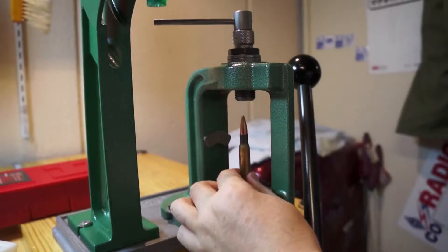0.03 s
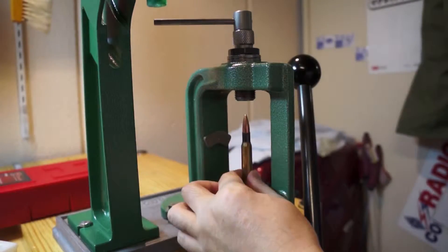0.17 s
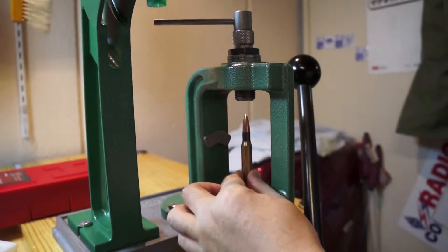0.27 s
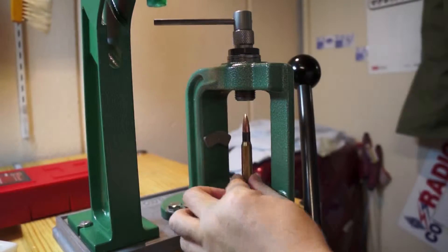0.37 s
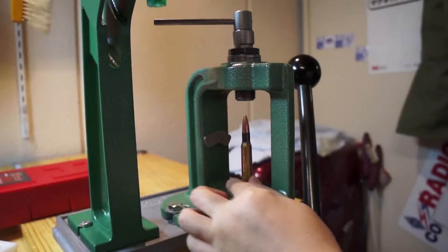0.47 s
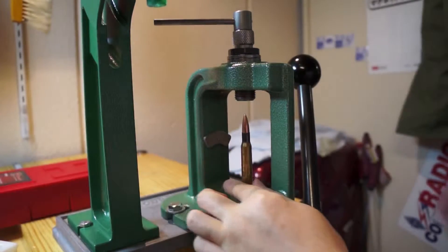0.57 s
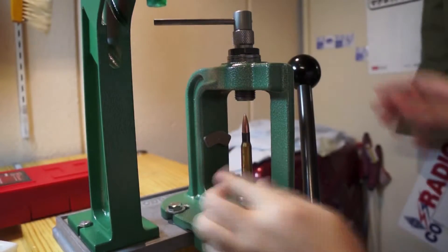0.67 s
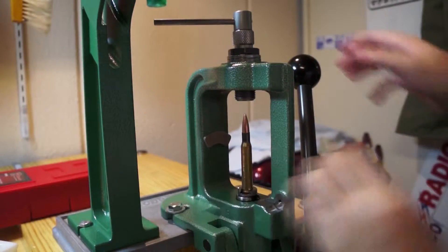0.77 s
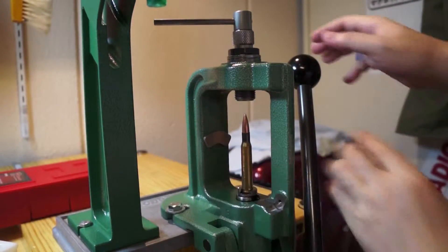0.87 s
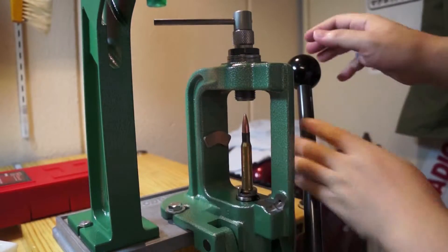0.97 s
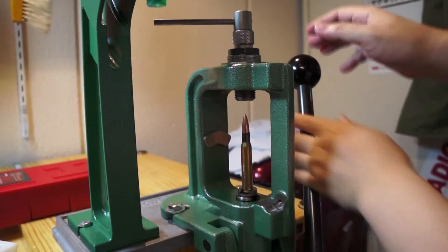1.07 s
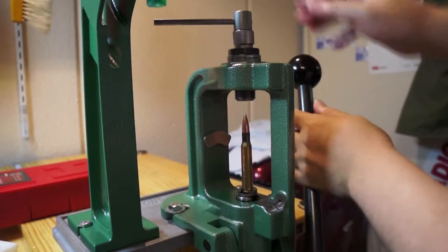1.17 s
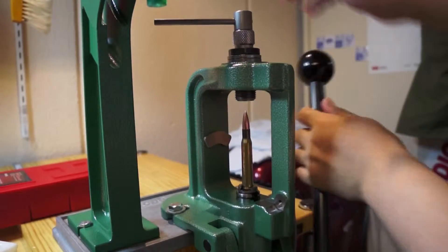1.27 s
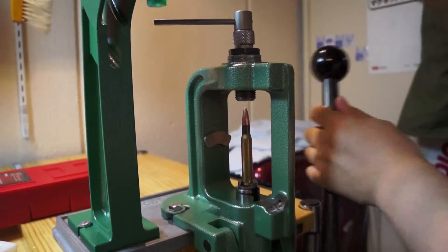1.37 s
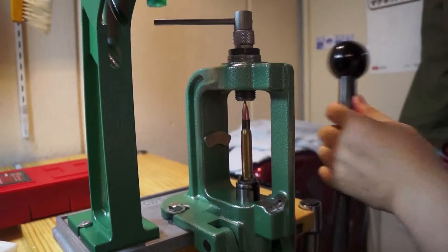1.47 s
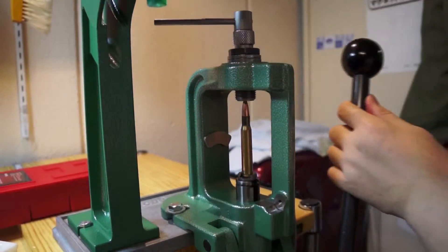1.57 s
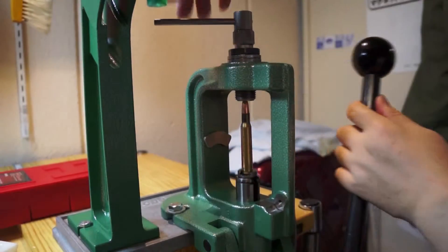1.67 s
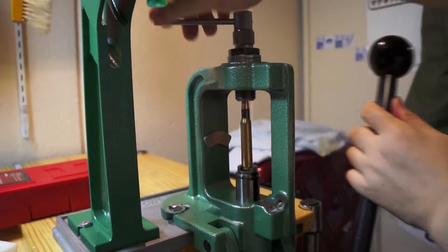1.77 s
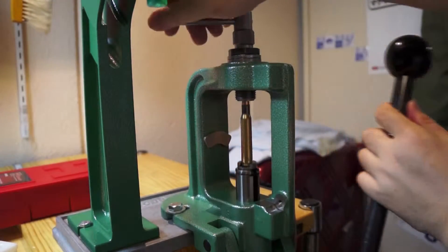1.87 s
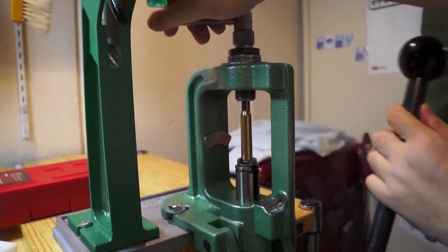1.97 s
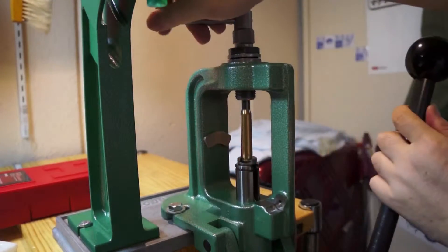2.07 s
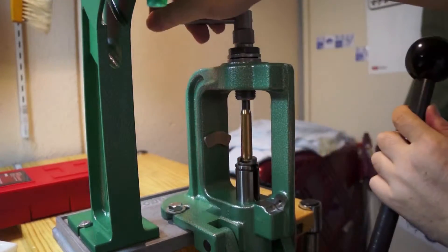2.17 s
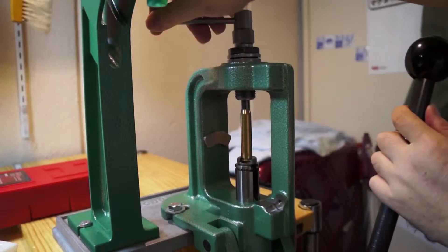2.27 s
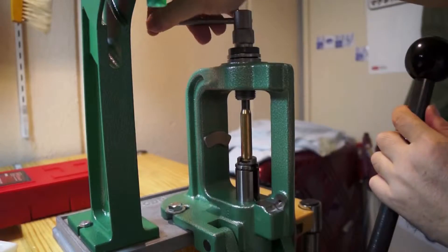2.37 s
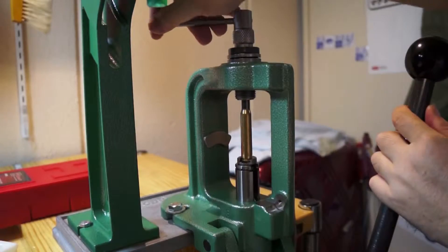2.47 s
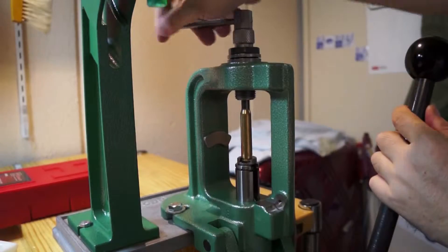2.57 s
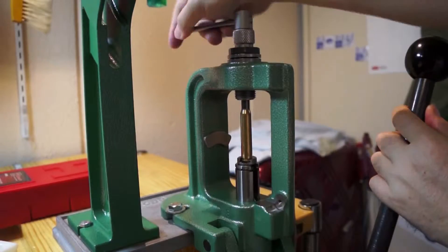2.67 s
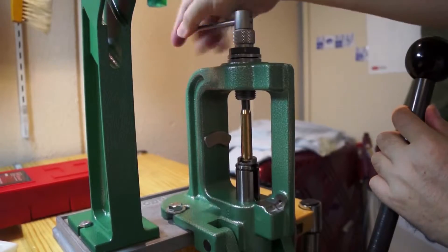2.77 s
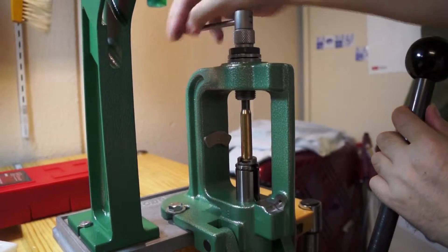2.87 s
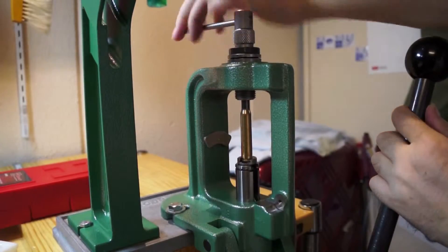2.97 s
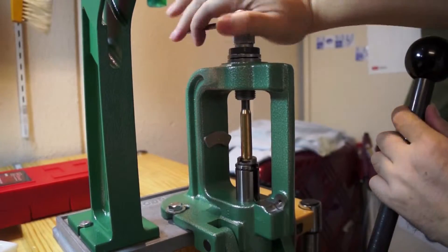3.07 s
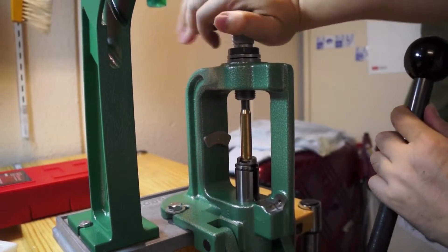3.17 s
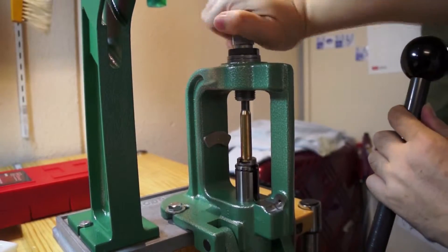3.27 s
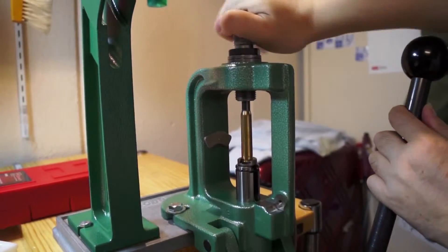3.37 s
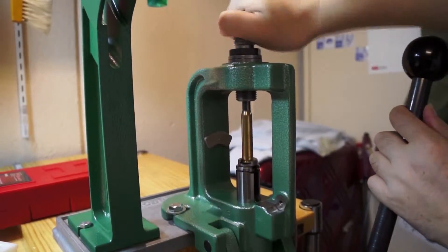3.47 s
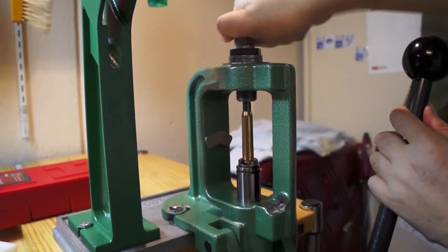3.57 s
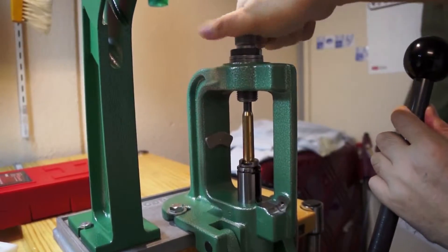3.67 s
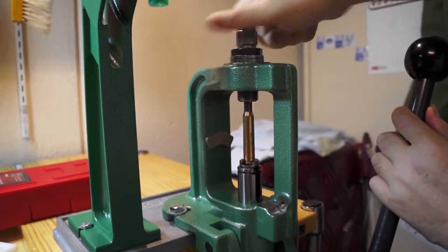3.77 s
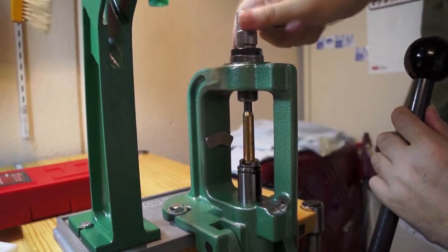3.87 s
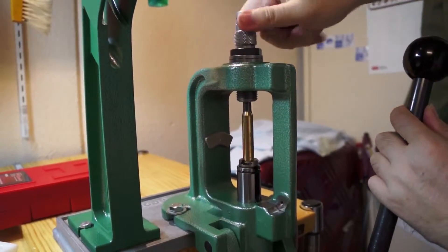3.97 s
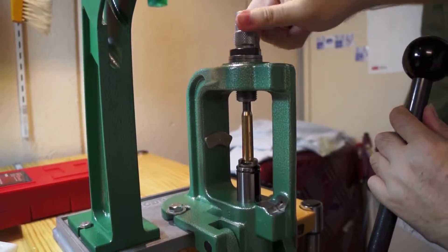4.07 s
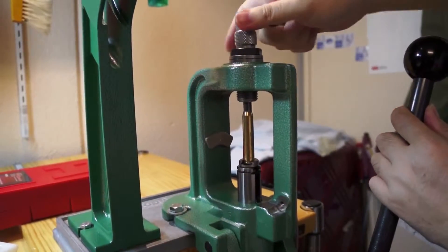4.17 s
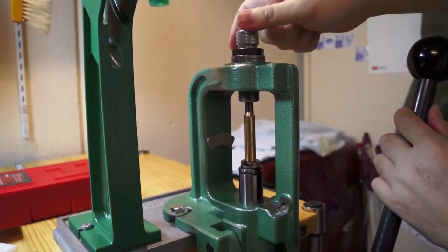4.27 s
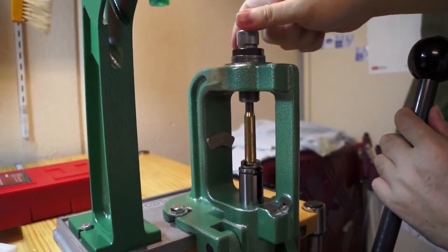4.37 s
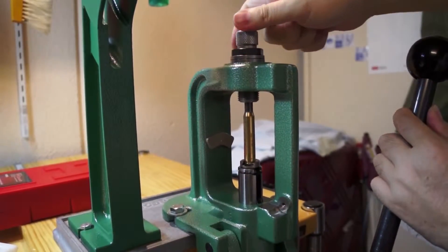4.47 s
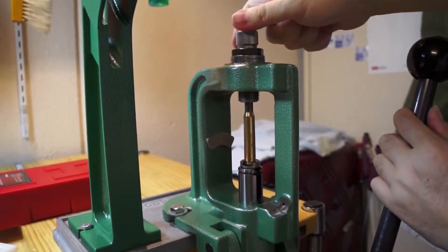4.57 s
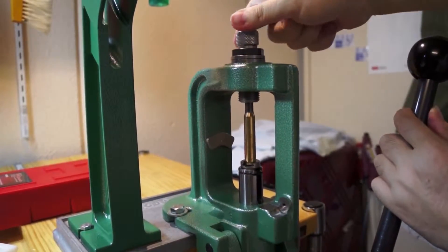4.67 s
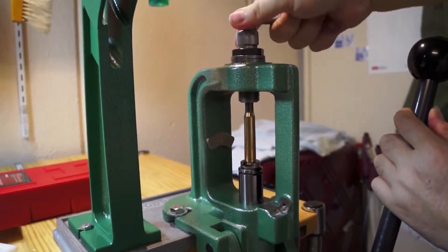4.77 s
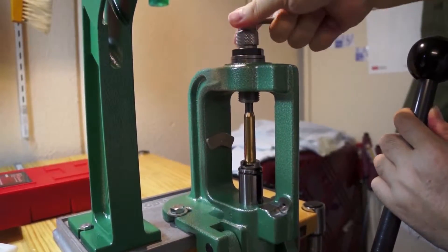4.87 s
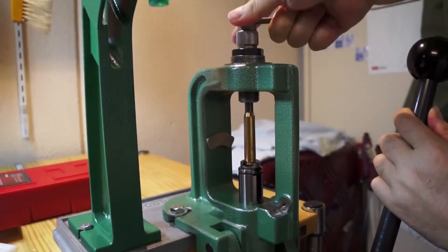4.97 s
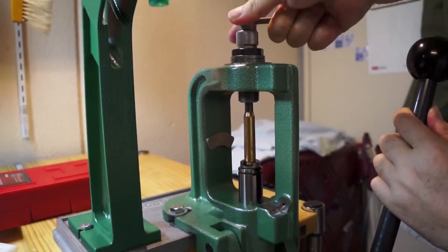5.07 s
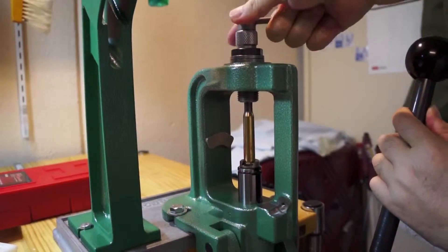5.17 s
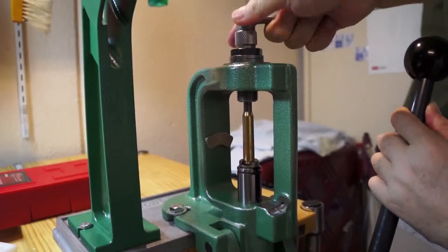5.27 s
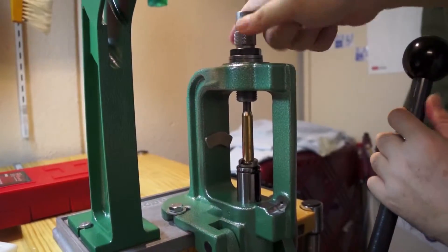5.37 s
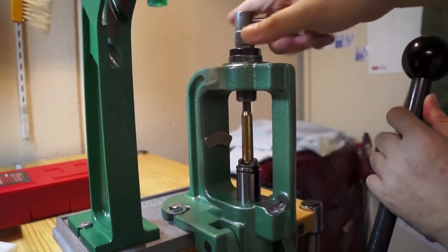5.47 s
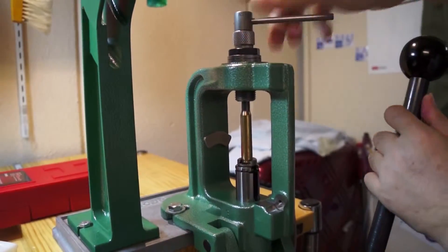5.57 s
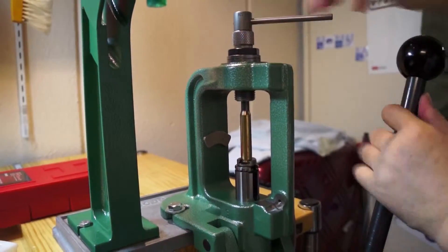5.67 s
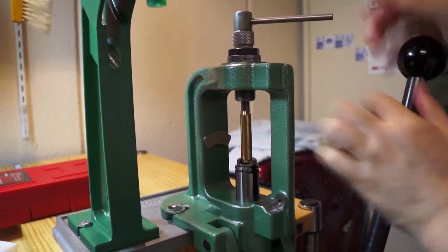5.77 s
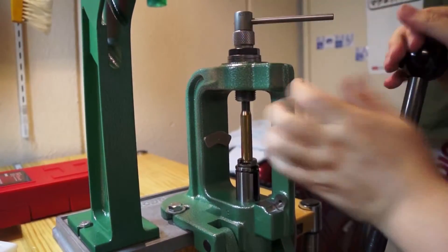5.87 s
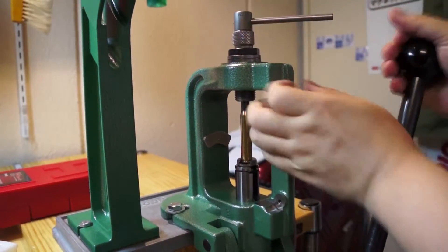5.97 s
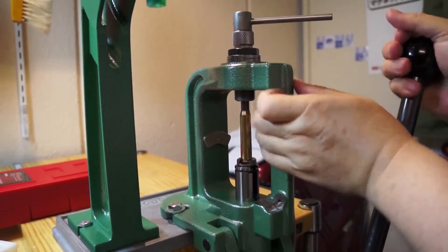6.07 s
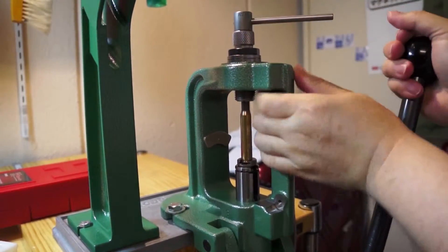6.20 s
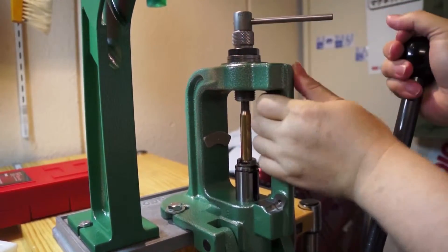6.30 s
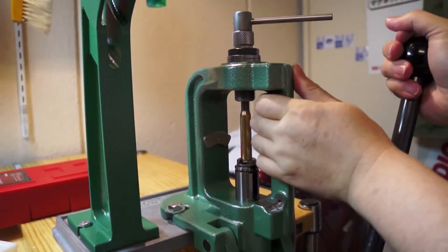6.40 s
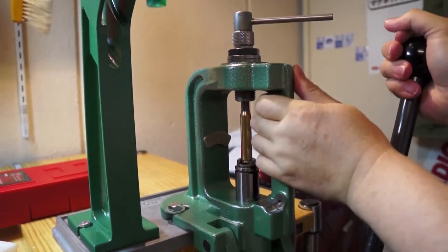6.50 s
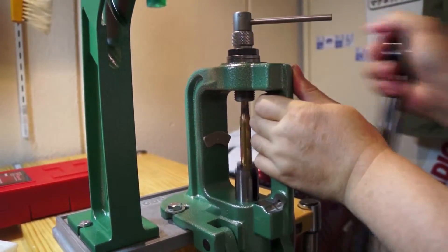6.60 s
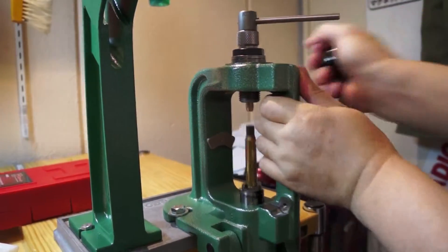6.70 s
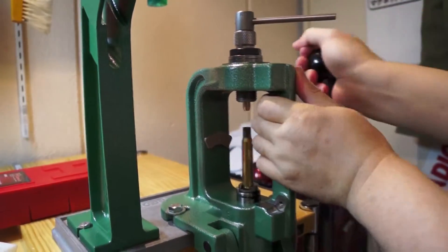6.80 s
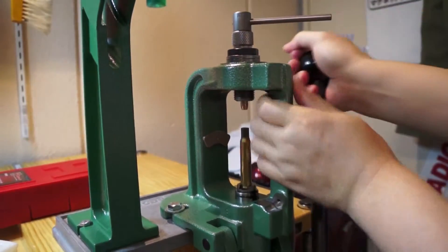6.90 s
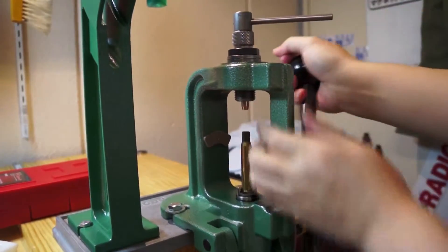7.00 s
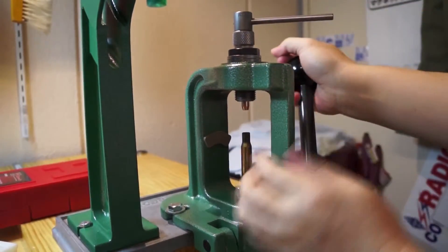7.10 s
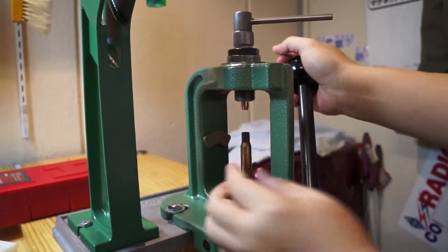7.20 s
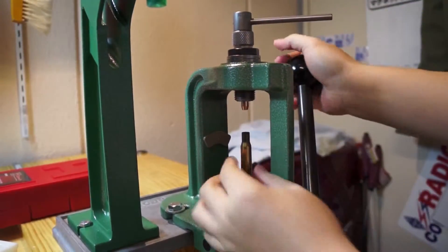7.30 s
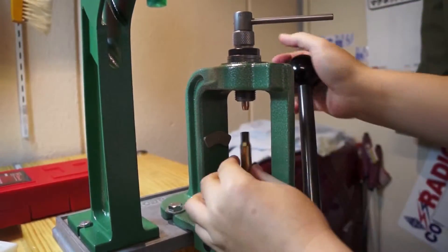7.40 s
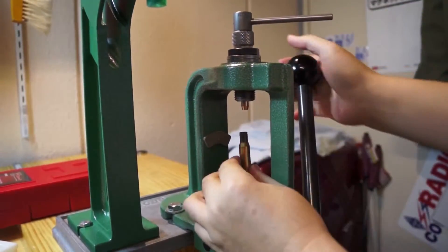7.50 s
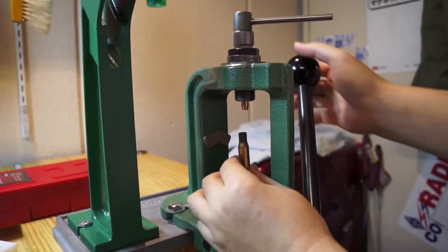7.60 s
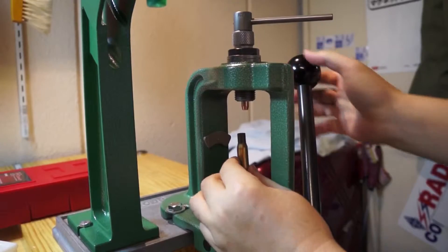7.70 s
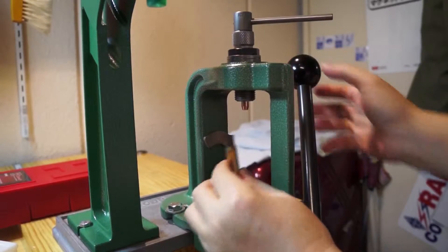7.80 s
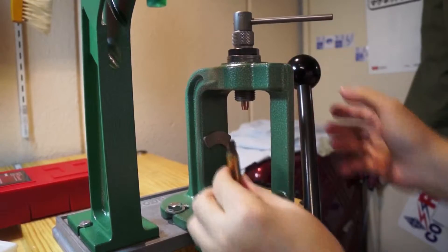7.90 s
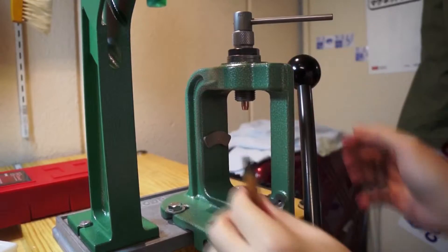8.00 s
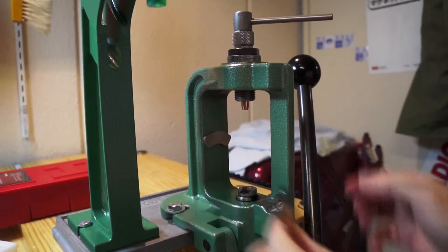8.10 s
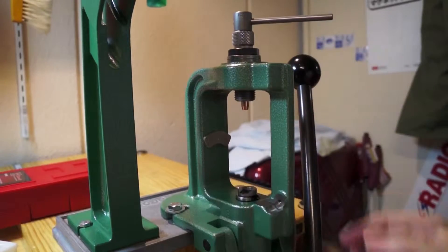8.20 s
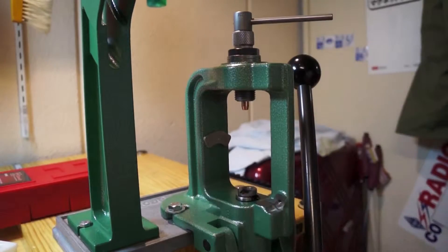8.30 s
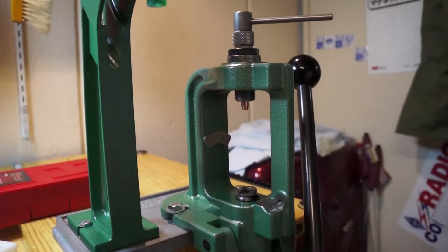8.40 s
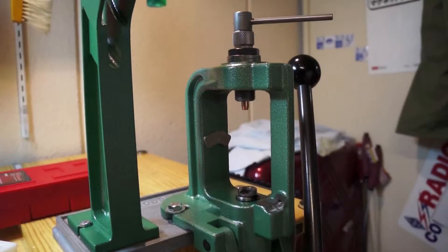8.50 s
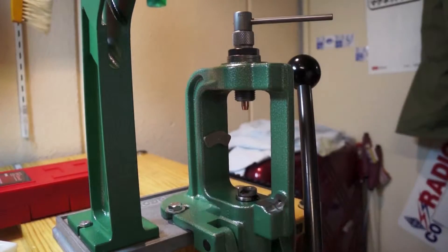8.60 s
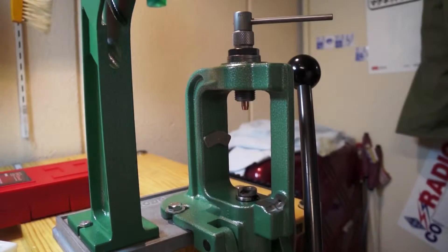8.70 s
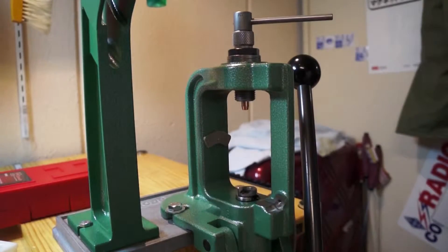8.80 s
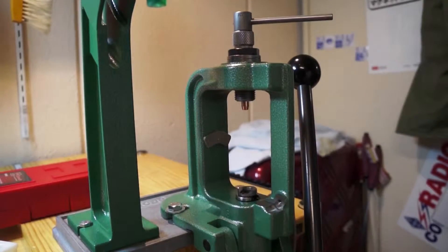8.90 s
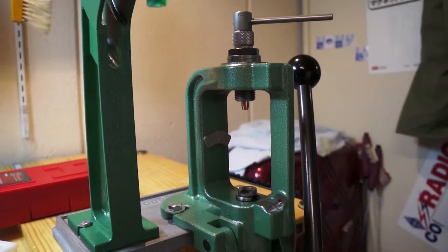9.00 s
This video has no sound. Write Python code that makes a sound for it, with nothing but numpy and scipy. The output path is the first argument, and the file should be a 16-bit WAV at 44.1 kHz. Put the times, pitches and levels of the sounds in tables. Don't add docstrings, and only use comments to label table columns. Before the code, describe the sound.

In a quiet room, hands work a cast-iron press: soft thuds, sharp knocks, ringing steel clinks, a loud juddering scrape, then small brass ticks.

```python
import sys
import numpy as np
from scipy import signal
from scipy.fft import rfft, irfft, next_fast_len
from scipy.io import wavfile
from scipy.ndimage import uniform_filter1d

SR = 44100
rng = np.random.default_rng(int(sys.argv[2]) if len(sys.argv) > 2 else 0)


def digitize_waveform(pressure):
    field = np.atleast_2d(pressure).T
    bounded = np.clip(field, -1, 1)
    quanta = np.round(bounded * 32767).astype(np.int16)
    wavfile.write(sys.argv[1], SR, quanta)


def how_loud(loudness_db):
    steps = np.asarray(loudness_db, float) / 20
    return 10 ** steps


N = 399105

# (f/Hz, width/Hz, level/dB)
BENCH_MODES = [(154, 9.5, -5.5), (266, 29, -15.5), (297, 160, 16), (433, 48, 11), (564, 450, 3.5)]


def evened(x):
    return x / np.sqrt(np.mean(x ** 2) + 1e-20)


def topped(x):
    return x / (abs(x).max() + 1e-20)


def read(points, hz):
    f, value = np.transpose(points)
    return np.interp(np.log(hz + 1), np.log(f + 1), value)


def levels(tables):
    t = np.arange(N) / SR
    out = 0
    for rows in tables:
        s, *columns = np.transpose(rows)
        fade = np.clip(np.minimum(t - s[0] + 0.035, s[-1] + 0.034 - t) / 0.04, 0, 1)
        out = out + np.array([how_loud(np.interp(t, s, c)) * fade for c in columns])
    return out


def add(mix, s, sound, pan_db=1):
    part = mix[:, max(round(s * SR), 0):][:, :len(sound)]
    part += how_loud(np.array([[pan_db / 2], [-pan_db / 2]])) * sound[:part.shape[1]]


def bandpass(x, low_hz, high_hz):
    return signal.lfilter(*signal.butter(2, [low_hz, high_hz], "band", fs=SR), x)


def coloured(x, points):
    size = next_fast_len(N)
    gain = how_loud(read(points, np.fft.rfftfreq(size, 1 / SR)))
    return evened(irfft(rfft(x, size) * gain, size)[..., :N])


def body(x, peaks):
    out = 0
    for hz, width, db in peaks:
        width = max(width, 10)
        b, a = signal.iirpeak(hz, hz / width, SR)
        out = out + how_loud(db) * signal.lfilter(b, a, x) / np.sqrt(width)
    return evened(out)


def grains(per_s, spread_db):
    size = how_loud(spread_db * np.minimum(rng.exponential(1, N), 4))
    return size * (rng.random(N) < per_s / SR) * rng.choice([-1, 1], N)


def swelling(t, rise):
    return (1 - np.exp(-t / rise)) ** 2


def ring(hz, db, t60, phase, length=.4):
    size = round(length * SR)
    t = np.arange(min(size, round(np.max(t60) * SR) + 1))[:, None] / SR
    sound = (how_loud(db - 60 * t / t60) * np.sin(2 * np.pi * (hz * t + phase))).sum(1)
    return np.pad(sound, (0, size - len(sound)))


def burst(low_hz, high_hz, t60, rise, length=.4):
    t = np.arange(round(length * SR)) / SR
    clumps = evened(uniform_filter1d(rng.standard_normal(len(t)), 70))
    noise = rng.standard_normal(len(t)) * how_loud(4 * clumps)
    sos = signal.butter(3, [low_hz, min(high_hz, .45 * SR)], "band", fs=SR, output="sos")
    band = signal.sosfilt(sos, noise[t < t60 + 5 * rise])
    u = t[:len(band)]
    sound = topped(band * how_loud(-60 * u / t60) * swelling(u, max(rise, 1e-4)))
    return np.pad(sound, (0, len(t) - len(u)))


def struck(hz, db, t60, fit=.03):
    phase, place, split = rng.random((3, 3, len(hz)))
    sound = 0
    for k in range(3):
        sound = sound + ring(hz * (1 + fit * (split[k] - .5)), db + 8 * place[k], t60, phase[k], .2)
    return topped(sound)


def tick(length=0.001):
    t = np.arange(300) / SR
    return topped(np.diff(rng.standard_normal(301)) * np.exp(-t / length))


def air():
    # (f/Hz, level/dB)
    tone_colour = [(22, -3.5), (48, -6.5), (105, -9), (337, -1.5), (620, -6), (9670, -23), (14300, -28),
                   (16000, -42)]
    # (f/Hz, likeness/0..1)
    likeness = [(60, 1), (180, 0.96), (550, 0.85), (1650, 0.46), (4970, 0.067), (15000, 0.2)]
    frames, hz = N // 256 + 5, np.fft.rfftfreq(1024, 1 / SR)
    a, b, c, d = rng.standard_normal((frames, 513, 4)).T
    same = read(likeness, hz)[:, None]
    left = a + 1j * b
    right = same * left + np.sqrt(1 - same ** 2) * (c + 1j * d)
    z = np.array([left, right]) * how_loud(read(tone_colour, hz)[:, None])
    return how_loud(-64) * evened(signal.istft(z, nperseg=1024, noverlap=768)[1][:, :N])


def whine():
    # (start/s, end/s, level/dB)
    runs = [
        (.13, .22, -80),
        (1.9, 2.06, -77),
        (8.155, 8.32, -78),
    ]
    out = np.zeros((2, N))
    for start, end, db in runs:
        t = np.arange(round((end - start) * SR)) / SR
        tone = np.sin(2 * np.pi * 11330 * t) * signal.windows.tukey(len(t), .2)
        add(out, start, how_loud(db + 5.0) * tone)
    return out


def hands():
    # (t/s, level/dB)
    pressure = [(0.0, -56), (0.76, -79), (1.2, -61), (2.04, -64.5), (2.24, -76), (2.59, -59.5),
                (3.05, -59.5), (3.6, -51.5), (3.7, -63.5), (4.07, -58.5), (4.44, -63), (4.83, -106),
                (5.2, -60.5), (5.95, -56.5), (6.3, -67), (7.95, -73), (8.274, -80), (9.05, -77)]
    # (strongest t/s, swell/s, fade/s, hiss/dB, rasp/dB)
    strokes = [(0.0, .1, 1, -84, -41), (0.45, 0.06, 0.18, -72, -58), (1.13, 0.17, 0.74, -73.5, -53),
               (2.09, 0.1, 0.032, -70, -70), (2.97, 0.22, 0.18, -70, -80), (3.6, 0.16, 0.12, -75, -59),
               (3.81, 0.27, 0.41, -72, -43.5), (4.192, 0.066, 0.34, -70.5, -39),
               (5.42, 0.35, 0.1, -80, -50), (5.71, .4, 0.14, -75, -70), (5.95, 0.26, 0.06, -70.5, -46),
               (9.05, 0.91, 0.11, -78, -42)]
    # (f/Hz, level/dB)
    hiss_colour = [(2940, -24), (5000, -11.5), (7840, -9), (9080, -3), (10600, -4.5), (14400, -21),
                   (15500, -15.5)]
    depth_db, touch_db = 37, -83.5
    shake = grains(400, 1.6)
    wide = bandpass(shake, 200, 1400)
    murmur = how_loud(-6.0) * levels([pressure])[0] * evened(body(shake, BENCH_MODES) + 0.45 * evened(wide))

    t = np.arange(0, N, 64) / SR
    hiss, rasp = np.full((2, len(t)), how_loud(touch_db))
    for s, swell, fade, hiss_db, rasp_db in strokes:
        stroke = how_loud(-depth_db * np.maximum((s - t) / swell, (t - s) / fade))
        hiss = hiss + how_loud(hiss_db) * stroke
        rasp = rasp + how_loud(rasp_db) * stroke
    hiss, rasp = (np.interp(np.arange(N) / SR, t, gain) for gain in (hiss, rasp))
    rub = how_loud(11.0) * hiss * coloured(grains(7600, 3.7), hiss_colour)
    rub += how_loud(-21.0) * rasp * evened(bandpass(grains(1000, 5.2), 1600, 5500))
    return np.array([murmur + rub, murmur + rub])


def pocks(mix):
    # (t/s, level/dB, f/Hz, t60/s)
    hollows = [(0, -59.5, 1397, 0.15), (0.018, -55.5, 1410, 0.069), (.251, -60.5, 1110, 0.033),
               (1.451, -64.5, 2384, 0.18), (1.49, -66, 2200, 0.11), (1.53, -70, 2170, .1),
               (4.484, -57, 1020, 0.015), (5.974, -55.5, 2470, 0.017), (6.213, -55, 2470, 0.017),
               (6.633, -60, 2520, 0.041), (6.8187, -21.5, 1380, 0.01), (7.336, -40, 1380, 0.0074),
               (7.485, -55, 1860, 0.04), (7.664, -46.5, 1200, 0.012), (7.793, -46, 1092, 0.043),
               (7.855, -47, 1203, 0.024), (8.032, -56, 1140, 0.011), (8.54, -61, 1380, 0.023)]
    onset = np.minimum(np.arange(round(.2 * SR)) / 50, 1)
    for s, db, hz, t60 in hollows:
        modes = ring(hz * np.array([1, 1.13, 1.9]), np.array([0, -7, -20]), t60, 0, .2)
        rough = burst(0.69 * hz, 1.61 * hz, t60, 0.00017, .2)
        add(mix, s, how_loud(db + 13.5) * topped(topped(modes * onset) + 0.55 * rough), 4)


def clicks(mix):
    # (t/s, level/dB, high ring f/Hz, high ring/dB, t60/s)
    snaps = [(3.3147, -10, 7100, 14, 0.0072), (3.3155, -20, 8560, 16, 0.31), (3.316, -34.5, 7200, 18, 0.15),
             (3.471, -32, 7040, 3, 0.011), (2.078, -39.5, 5900, 6, 0.03), (2.654, -50, 6000, -1, 0.027),
             (3.299, -38, 6240, 3, 0.039), (6.048, -30, 8730, 13, 0.054), (5.6865, -37, 5960, -10, .03),
             (5.9455, -46, 8500, 6, .008), (6.8095, -21, 12000, 10, .008), (6.077, -23.5, 6400, -19, 0.015),
             (6.112, -32, 9000, 3.5, .01), (6.1995, -40, 7450, 3.5, 0.011), (4.078, -46, 10260, 14, .03),
             (4.1809, -50, 8300, 12, 0.075), (4.193, -44.5, 9250, 1, 0.038), (4.206, -61, 6600, -5, 0.023),
             (5.383, -51.5, 7140, 1, 0.081), (6.049, -23, 11330, -5, 0.13), (6.1482, -21, 7400, 3.5, 0.012),
             (6.703, -11, 9760, 15, 0.2), (7.4756, -29, 9660, 28, 0.076), (7.763, -21, 9830, 27, 0.072),
             (7.785, -25.5, 10200, 19, 0.054), (7.818, -17, 9520, 6.5, 0.061),
             (7.8294, -28, 6330, 6, 0.018)]
    # (t/s, level/dB, low ring f/Hz, t60/s)
    dull = [(0.0753, -38.5, 4200, 0.037), (0.2512, -42, 2380, 0.026), (0.2685, -36, 3470, 0.026),
            (2.063, -34, 3430, 0.04), (2.648, -37.5, 2800, 0.047), (3.2212, -40.5, 3800, 0.0083),
            (3.316, -20.5, 2550, 0.054), (6.2123, -47, 5000, 0.016), (6.7, -10, 2960, 0.022),
            (6.791, -13, 5200, 0.043)]
    high_over_low = 2.065
    rows = [(s, db, hz * high_over_low, -20.5, t60) for s, db, hz, t60 in dull]
    for s, db, high_hz, high_db, t60 in rows + snaps:
        low_hz = high_hz / high_over_low
        low = burst(0.716 * low_hz, 1.245 * low_hz, t60, 0.00072, .2)
        smear = min(0.026 + 0.0014 / t60, .3)
        high = burst((1 - smear) * high_hz, (1 + smear) * high_hz, 0.37 * t60, 0.000064, .2)
        crack = burst(1300, 13600, .5 * t60, 0.000067, .2)
        add(mix, s, how_loud(db) * topped(low + how_loud(high_db) * (high + 0.77 * crack)), 3)
        add(mix, s, how_loud(db - 11.0) * burst(1600, 15500, 0.0018, .0001, .02), 3)


def rattles(mix):
    # (t/s, level/dB)
    shakes = [(0.0754, -39), (0.2492, -29.5), (0.2713, -52), (7.4755, -34), (7.7638, -18.5), (7.785, -17),
              (7.8185, -27), (7.83, -13)]
    # (f/Hz, level/dB, t60/s)
    case_modes = [(2550, -22, 0.42), (3450, -18, 0.18), (3910, -18, 0.99), (4020, -24, 0.24),
                  (5000, 2, 0.11), (5130, -23, 0.55), (5950, -22, 0.46), (6780, -9, 0.074),
                  (7330, -11, 0.28), (8360, -7, 0.24), (8800, -28, 0.28), (9240, -52, 0.22),
                  (8650, -20, 0.31), (9360, -16, 0.46)]
    hz, db, t60 = np.transpose(case_modes)
    for s, top_db in shakes:
        add(mix, s, how_loud(top_db - 14.0) * struck(hz, .5 * db, np.minimum(t60, .05), fit=0.126), 1.5)
        add(mix, s, how_loud(top_db - 17.5) * burst(3400, 7200, 0.12, .001, .2), 1.5)


def clinks(mix):
    # (t/s, level/dB, left over right/dB, lower modes/dB)
    strikes = [(3.363, -31, 2, -20), (3.4163, -37, 15, -2), (3.48, -34, 8, -6), (3.5615, -38, 5, 16),
               (3.733, -48.5, 5, -22), (4.278, -49, 7, 9), (4.323, -47, 8, 9), (5.946, -46.5, 10.5, -13),
               (5.9744, -25, 0, -24), (6.128, -33, 1, -23.5), (6.1489, -21, -2, -25),
               (6.2112, -19.5, 3, -24), (6.2566, -22.5, 2.5, -14.5), (6.586, -28, 4, -15),
               (6.63, -25, 0.5, -9), (6.7703, -19, 3.5, -20), (6.7883, -13.5, -4.5, -29.5),
               (6.8301, -15, 1, -14), (6.9157, -30.5, 4, -17), (7.044, -28, 11, -8), (7.1564, -37, 11, -20)]
    # (level/dB, t60/s)
    bar_modes = [(-3.5, 0.015), (-6.5, 0.09), (0.5, 0.025), (-29.5, 0.06), (16, 0.032), (-24, 0.12),
                 (-16.5, 0.075), (4.5, 0.13)]
    bar_hz = np.array([5238, 6110, 6207, 7900, 10930, 11010, 14150, 14330])
    db, t60 = np.transpose(bar_modes)
    for s, top_db, pan_db, low_db in strikes:
        mode_db = db + (low_db + 28.5) * (bar_hz < 7000)
        add(mix, s, how_loud(top_db) * struck(bar_hz, mode_db, t60), pan_db)
        add(mix, s, how_loud(top_db + 8) * tick(), pan_db)


def scrape():
    # (t/s, level/dB)
    force = [
        [(6.7, -39), (6.752, -30), (6.81, -22), (6.88, -30), (6.922, -26), (7.05, -34), (7.2, -50), (7.41, -63),
         (7.68, -66.5)],
        [(7.75, -88), (7.772, -58), (7.85, -59), (7.95, -110)],
    ]
    # (f/Hz, width/Hz, level/dB)
    frame_modes = [(1028, 52, 21), (1110, 270, 12), (1260, 80, 3), (1380, 52, 10), (1790, 140, 17),
                   (2300, 260, -19.5), (2950, 200, -44)]
    # (f/Hz, level/dB)
    edge_colour = [(1470, -24), (2500, 31.5), (5000, -14.5), (6900, 17), (10700, 24.5), (13000, -20),
                   (14500, -8), (15500, -19)]
    frame = levels(force)[0]
    bench = how_loud(-10.5) * frame ** 0.59
    edge = how_loud(-8) * frame ** 0.8
    clumps = uniform_filter1d(uniform_filter1d(rng.standard_normal(N), 300), 300)
    clumps = how_loud(2.9 * evened(clumps))
    slips = grains(4500, 2.5) * clumps
    wide = bandpass(slips, 600, 3200)
    sound = frame * evened(body(slips, frame_modes) + 0.55 * evened(wide))
    sound += edge * coloured(grains(5000, 8.5) * clumps, edge_colour)
    pan = how_loud(np.array([[1.4], [-1.4]]))
    return how_loud(-7.5) * (sound * pan + bench * body(slips, BENCH_MODES))


def judders(mix):
    # (t/s, level/dB, f/Hz, t60/s)
    catches = [(6.707, -29, 660, .04), (6.712, -21, 1726, 0.031), (6.723, -27, 603, 0.037),
               (6.716, -27, 845, 0.0395), (6.732, -25, 2020, .03), (6.745, -21, 800, 0.036),
               (6.79, -32, 3680, 0.062), (6.791, -28, 7800, .08), (3.085, -55, 2500, .12),
               (7.82, -35, 3750, .08), (6.756, -24, 1660, 0.025), (6.776, -24, 1250, 0.04),
               (6.8, -40, 451, 0.056), (6.802, -22, 1900, .03), (6.82, -25, 428, 0.042),
               (6.843, -29.5, 434, 0.054), (6.863, -22, 1150, .04), (6.883, -24.5, 553, 0.096),
               (6.884, -25, 1580, .03), (6.9, -22, 705, .05), (6.915, -17, 1157, 0.039),
               (6.919, -23, 477, 0.043), (6.933, -27, 2370, 0.024), (6.937, -12.5, 1212, 0.028),
               (6.945, -17.5, 1185, .04), (6.975, -24, 1090, .04), (6.976, -22, 1910, 0.033),
               (6.987, -22, 470, 0.039), (6.995, -22, 1150, 0.034), (7.011, -18, 1186, .04),
               (7.031, -18.5, 1000, 0.071), (7.042, -29, 997, 0.033), (7.085, -31, 1060, 0.033),
               (7.104, -31, 439, 0.046), (7.18, -27.5, 1164, 0.035), (7.215, -34, 1130, .04),
               (4.155, -60, 2300, .06), (4.204, -49, 2950, 0.034), (4.28, -55, 1440, .1),
               (4.3, -54, 1676, 0.073), (4.365, -61, 1600, .1), (4.39, -60, 1400, .06),
               (4.435, -56, 1080, .06), (4.499, -59, 990, .1), (6.002, -47, 1000, 0.042),
               (6.247, -39.5, 2300, .04), (6.296, -39.5, 1172, 0.027), (3.83, -53.5, 994, 0.068)]
    rise = 0.0017
    t = np.arange(round(.12 * SR)) / SR
    for s, db, hz, t60 in np.array(catches) * [1, 0.97, 1, 0.67]:
        pair = ring(hz * np.array([1, 1.07]), np.array([0, -8]), t60, rng.random(2), .12)
        hum = topped(pair * swelling(t, rise))
        fringe = burst(0.65 * hz, 1.3 * hz, t60, rise, .12)
        add(mix, s - .001, how_loud(db) * topped(hum + 0.97 * fringe), 3.5)


def landings(mix):
    # (t/s, level/dB, swell/s)
    spots = [
        (2.076, -32.5, 0.0043),
        (2.651, -34, 0.0029),
        (3.303, -24.5, .005),
        (6.052, -27, 0.014),
    ]
    # (f/Hz, level/dB, t60/s)
    die = [(238, -20, 0.29), (357, -12, 0.18), (558, -4, 0.087), (685, -14.5, 0.52), (770, -25, 0.12),
           (1157, -24, 0.33), (1412, -5, 0.14), (1780, -10, 0.23), (1927, -13, 0.21)]
    collet = [(257, -2, 0.34), (442, -2.5, 0.23), (654, -20.5, 0.36), (776, -25, 0.34), (1080, -15, 0.57),
              (1315, -13, 0.24), (1408, -13, 0.24), (1728, -6, 0.21)]
    handle = [(134.8, 2, 0.44), (219.7, 5, 0.41), (436, 2, 0.19), (519, -8, 0.42), (1185, -15, 0.24),
              (1340, -13, 0.29), (1550, -30, 5.0), (1970, -32, 5.0)]
    lever = [(243, 3, 0.22), (360, -20.5, 5.0), (436, -3, 0.39), (658, -19.5, 5.0), (1068, -18.5, 2.2),
             (1157, -10, 5.0), (1599, -35.5, 0.26), (1895, -41, 5.0)]
    t = np.arange(round(.3 * SR)) / SR
    for (s, top_db, swell), modes in zip(spots, (die, collet, handle, lever)):
        hz, db, t60 = np.transpose(modes)
        sound = ring(hz, 1.04 * db, np.minimum(0.52 * t60, .22), rng.random(len(hz)), .3)
        add(mix, s, how_loud(top_db) * topped(sound * swelling(t, swell)), 2.5)


def thuds(mix):
    # (t/s, bench/dB, main f/Hz, t60/s)
    pushes = [(0.078, -53, 505, 0.22), (0.342, -54.5, 294, 0.077), (0.859, -54.5, 401, 0.18),
              (1.274, -39.5, 321, 0.092), (1.542, -48.5, 457, 0.048), (2.979, -42, 484, 0.092),
              (3.068, -36.5, 514, 0.15), (3.231, -36.5, 252, 0.13), (3.316, -34, 231.6, 0.13),
              (4.091, -53, 93, 0.066), (4.116, -53.5, 430, 0.17), (4.5, -48, 373, 0.21),
              (4.565, -47, 423, 0.054), (2.045, -50, 312, 0.16), (2.068, -41, 418, 0.036),
              (3.31, -46, 37.8, 0.26), (0.525, -45, 500, 0.11), (.56, -52, 520, 0.094),
              (3.85, -51.5, 400, 0.14), (3.99, -53, 331, 0.14), (7.148, -40, 150, .08),
              (7.35, -41, 438, 0.24), (7.52, -43, 436, 0.24), (7.788, -54, 253, .15),
              (7.902, -51.5, 443.6, 0.21)]
    # (t/s, bench/dB, frame/dB, main f/Hz, t60/s)
    knocks = [(2.076, -31, -33, 526, 0.087), (2.653, -36, -43, 243, 0.11), (2.836, -51, -59.5, 211, 0.36),
              (3.307, -31.5, -28, 123, 0.35), (4.423, -44, -56.5, 455, 0.19),
              (6.061, -29, -35.5, 253, 0.15), (6.696, -26, -21.5, 680, 0.17),
              (7.125, -22.5, -29.5, 255, 0.075), (7.209, -39.5, -40.5, 452, 0.21)]
    # (t/s, bench/dB, frame/dB, edge/dB, main f/Hz)
    blows = [(1.257, -43, -58, -56, 465), (1.447, -48.5, -57, -61, 511), (3.298, -30, -30.5, -24.5, 257),
             (5.633, -45, -62, -58, 233), (5.687, -39, -44, -35, 441), (5.92, -50, -66, -68, 476),
             (6.047, -32, -28.5, -24, 452), (6.553, -38.5, -44, -44, 432)]
    rise = 0.0098
    rows = [(s, db, db - 19.5, db - 21, hz, t60) for s, db, hz, t60 in pushes]
    rows += [(s, db, frame_db, frame_db - 22, hz, t60) for s, db, frame_db, hz, t60 in knocks]
    rows += [(*blow, 0.17) for blow in blows]
    swell = swelling(np.arange(round(.4 * SR)) / SR, 0.44 * rise)
    for s, bench_db, frame_db, edge_db, hz, t60 in rows:
        u, phase = rng.random((2, 4))
        hard = min(how_loud(frame_db - bench_db + 12.0), 1.6)
        tone = ring(hz, -8 * abs(2 * u - 1), t60, phase) * swell
        legs = burst(89, 230, 1.48 * t60, rise) + .5 * ring(150.0, 0, 0.33 * t60, phase[0]) * swell
        legs_gain = min(how_loud(0.9 * (bench_db + 24.5)), .7) * min(hard, 1)
        bench = topped(tone) / (1 + hard)
        bench = bench + (0.44 + hard) * burst(174, hz + 200, t60, rise)
        bench = bench + legs_gain * topped(legs)
        add(mix, s - .002, how_loud(bench_db) * topped(bench), 1.5)
        add(mix, s - .002, how_loud(frame_db + 5.5) * burst(357, 1920, 1.22 * t60, 0.5 * rise), 2.5)
        add(mix, s - .002, how_loud(edge_db + 1) * burst(1470, 3530, 0.44 * t60, 0.86 * rise), 1.5)


def ports(x):
    echoes = rng.standard_normal(260) * np.exp(-np.arange(260) / 70) * (rng.random(260) < .12)
    echoed = np.convolve(x.mean(0), echoes / np.linalg.norm(echoes))[:N]
    side = signal.lfilter(*signal.butter(1, 1200, "high", fs=SR), echoed)
    return x + 0.65 * np.array([side, -side])


def room(x):
    # (f/Hz, t60/s)
    decay = [(100, 0.44), (300, 0.41), (700, 0.58), (1800, 0.39), (5000, 0.47), (12000, 0.35)]
    echoes = np.zeros((2, SR))
    at = np.arange(120, SR - 20, 20) + rng.integers(0, 20, (2, (SR - 121) // 20))
    np.put_along_axis(echoes, at, rng.choice([-1., 1.], at.shape), 1)
    hz, t, z = signal.stft(echoes, SR, nperseg=256)
    tail = signal.istft(z * how_loud(-60 * t / read(decay, hz)[:, None]), SR, nperseg=256)[1]
    wet = signal.fftconvolve(x[None], tail / np.linalg.norm(tail[0]), axes=1)[:, :N]
    side = signal.lfilter(*signal.butter(2, 600, "high", fs=SR), wet[0] - wet[1]) / 2
    return wet.mean(0) * 1.726 + np.array([side, -side])


def microphone(x):
    # (f/Hz, level/dB)
    response = [(20, -20), (70, 1), (120, 2.5), (11000, -6), (12500, -15), (15500, -19), (17000, -71)]
    # (f/Hz, left over right/dB)
    lean = [(100, -1.5), (500, -1), (1000, 1), (3000, -1), (8000, 3.5), (12500, -4.5)]
    hz = np.linspace(0, SR / 2, 513)
    colour = []
    for way in (1, -1):
        gain = how_loud(2 * read(response, hz) + way * read(lean, hz))
        colour.append(signal.minimum_phase(signal.firwin2(1023, hz, gain, fs=SR)))
    return signal.oaconvolve(x, np.array(colour), axes=1)[:, :N]


def scene():
    hits = np.zeros((2, N))
    for source in (pocks, clicks, rattles, clinks, judders, landings, thuds):
        source(hits)
    near = hits + scrape() + hands()
    heard = ports(near) + how_loud(-7) * room(near.mean(0))
    return microphone(heard) + whine() + air()


def band_limit(x):
    return signal.sosfilt(signal.butter(12, 16500, fs=SR, output="sos"), x)


def record(dry):
    hz, t, z = signal.stft(dry, SR, nperseg=512, noverlap=256)
    power = (abs(z) ** 2).mean(0)
    loud_db = 10 * np.log10(power[(hz > 6000) & (hz < 11600)].sum(0) + 1e-14)
    band_db = 10 * np.log10(uniform_filter1d(power, 8, 0) + 1e-14)
    margin_db, quiet_db = 32, -62
    keep = (hz[:, None] < 11400) | (band_db > loud_db - margin_db) | (loud_db < quiet_db)
    mix = signal.istft(z * keep, SR, nperseg=512, noverlap=256)[1][:, :N]
    return band_limit(mix)


dry = scene()
out = record(dry)
digitize_waveform(out)
```